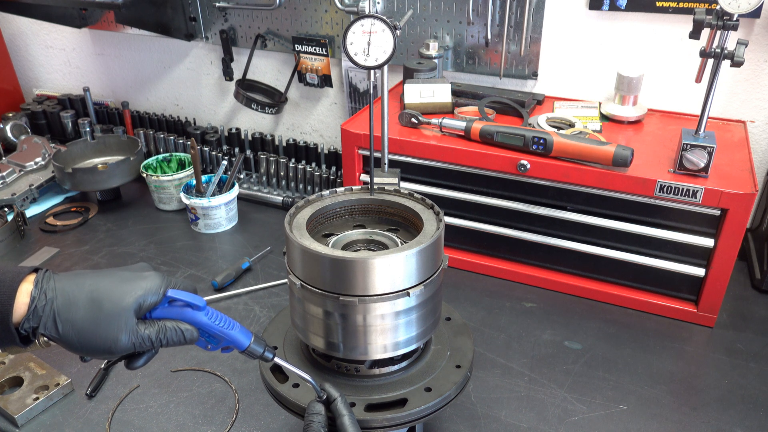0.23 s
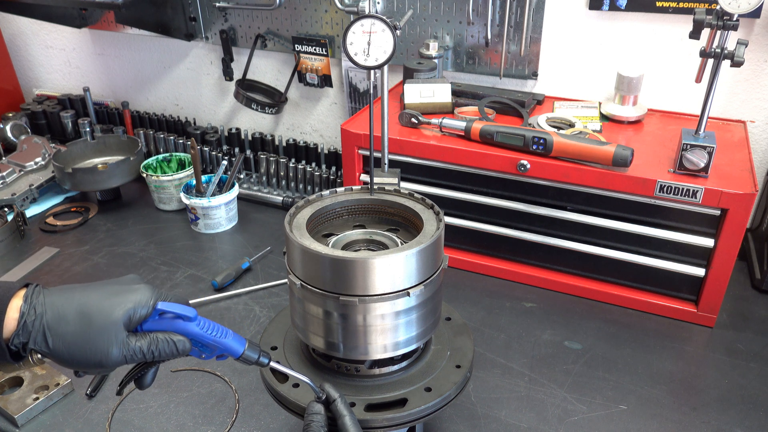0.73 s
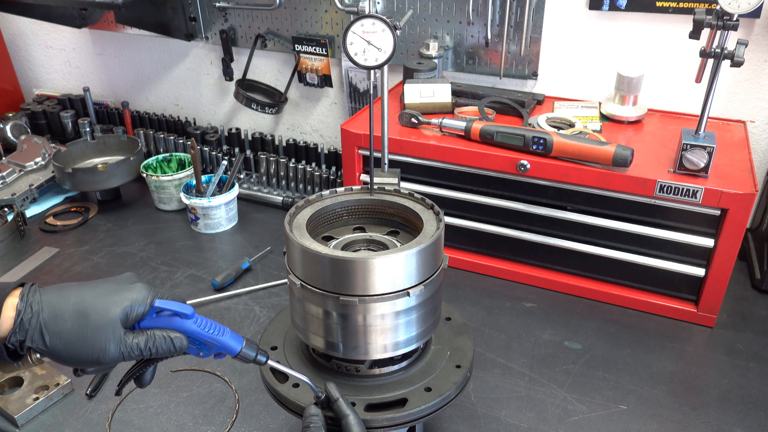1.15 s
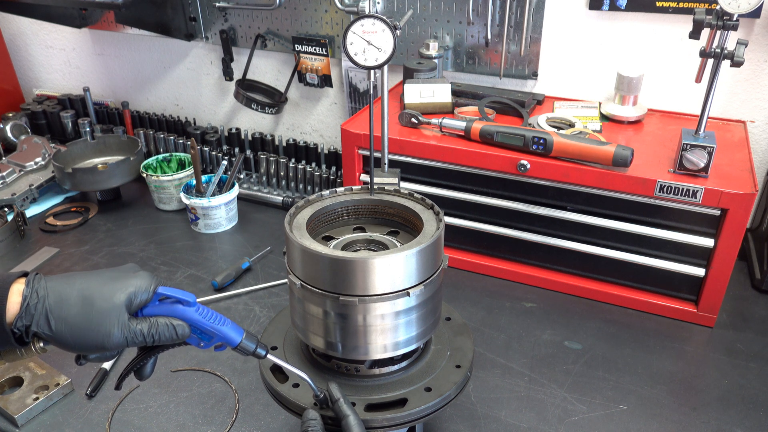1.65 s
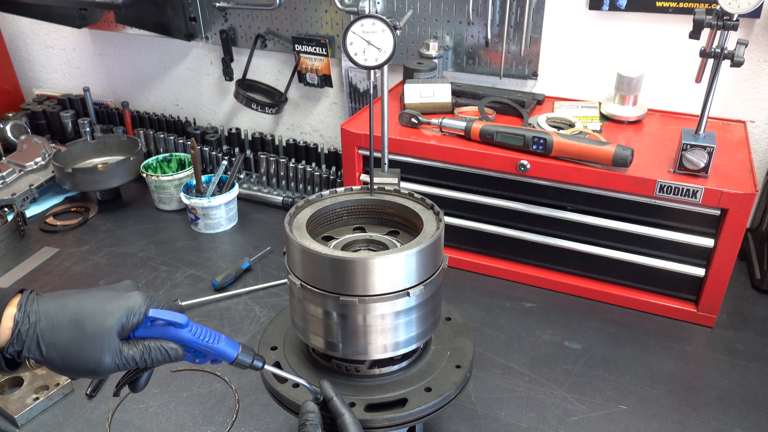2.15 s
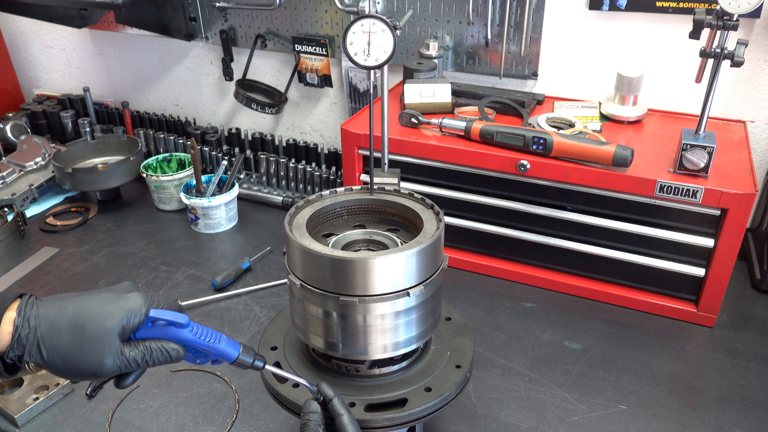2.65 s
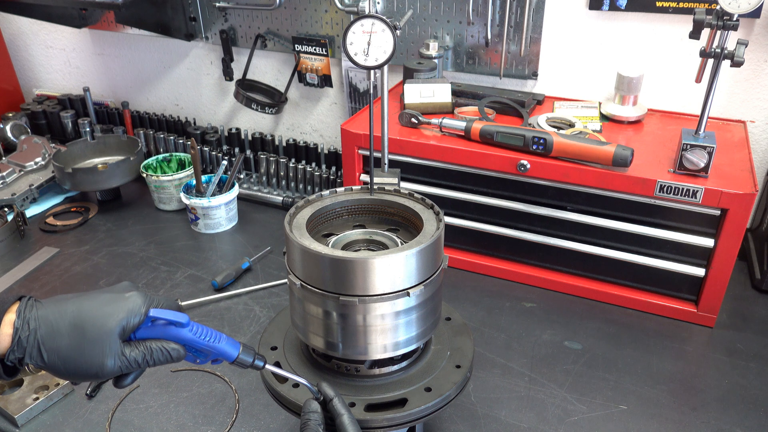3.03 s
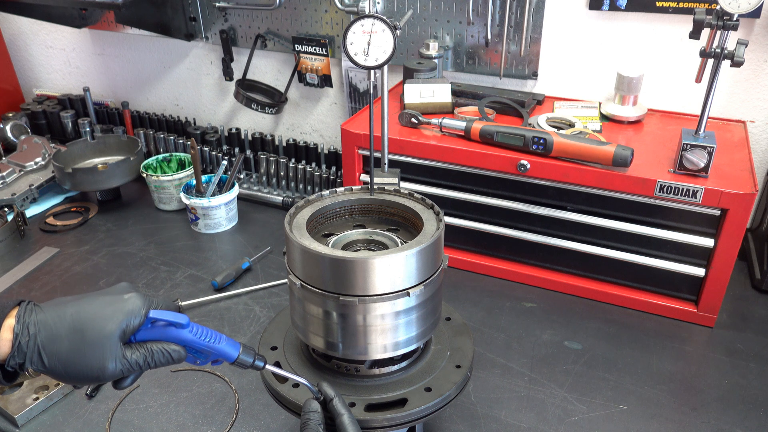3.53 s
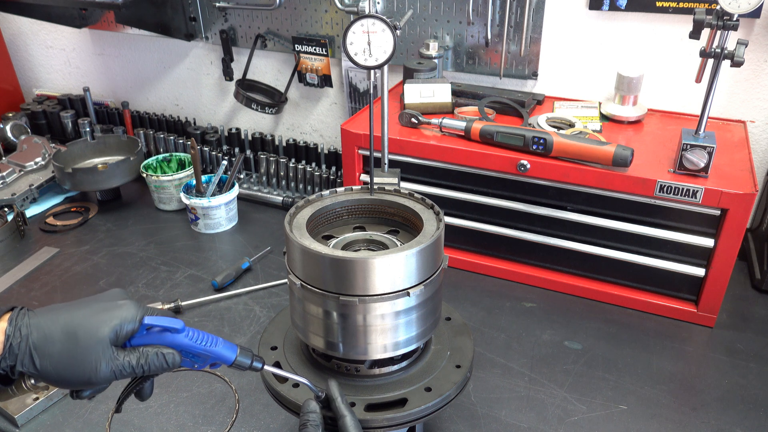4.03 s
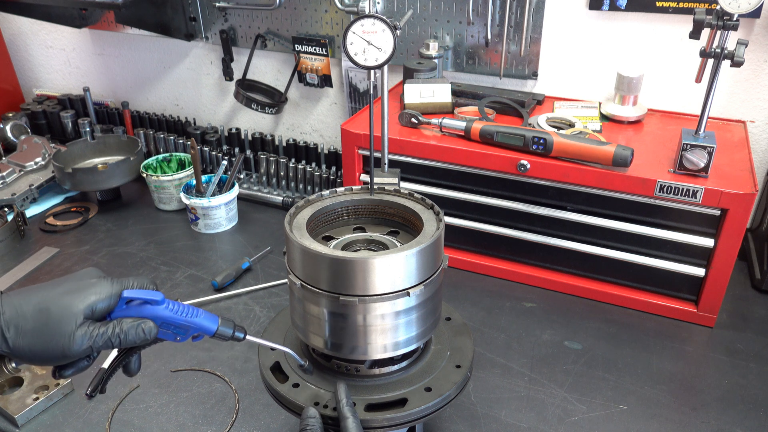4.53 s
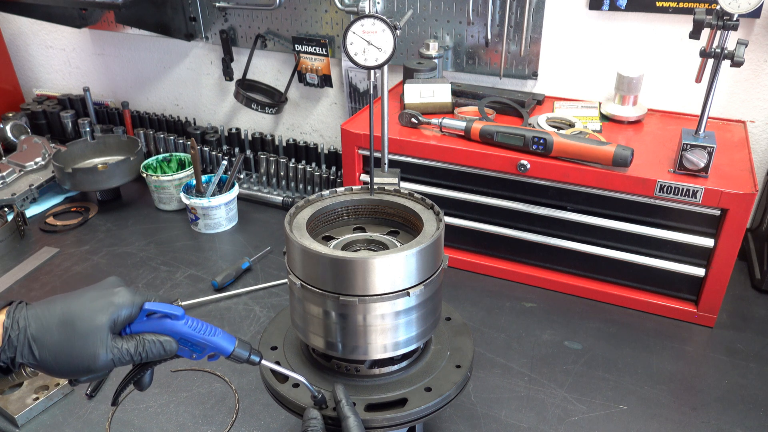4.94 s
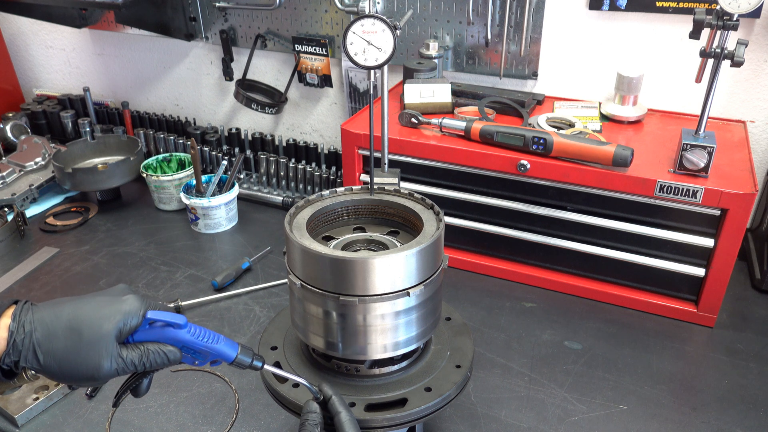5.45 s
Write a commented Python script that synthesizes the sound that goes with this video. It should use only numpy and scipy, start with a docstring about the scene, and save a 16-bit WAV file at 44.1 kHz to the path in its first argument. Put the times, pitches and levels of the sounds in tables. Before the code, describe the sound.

Compressed air blasts past a loose nozzle, bright and rough, then weakens and darkens before stopping. The room falls back to fan drone and thin leaking hiss. Rapid oily metallic clacks start a steady, resonant, much quieter air rush through a sealed drum; a sudden loud spit and brief venting whistle end it. Background only follows. Short indoor reverberation, centred sound, no voice.

```python
"""Compressed air hisses past a loose blow-gun nozzle, as the clutch drum of a transmission is air-tested on a bench.
Turbulent jets are shaped noise: the loose nozzle, the emptying drum, then a rush through the sealed drum.
Gliding edge tones, short spits and the knocks of piston and plates (damped modes and noise) mark the changes.
Behind them lie a ventilation drone, motor hum and a leaking air line; a limiter ducks them under loud blasts."""
import sys
import numpy as np
from scipy import signal
from scipy.fft import rfft, irfft
from scipy.io import wavfile
from scipy.ndimage import uniform_filter1d

SR = 44100
rng = np.random.default_rng(int(sys.argv[2]) if len(sys.argv) > 2 else 0)


def put_to_file(sound):
    """Save the sound as 16-bit audio at rate SR, in the file named by the first command-line argument."""
    columns = np.atleast_2d(sound).T  # one column per channel
    safe = np.clip(columns, -1, 1)
    whole_steps = np.round(safe * 32767)
    wavfile.write(sys.argv[1], SR, whole_steps.astype(np.int16))


N = 250488
TIME = np.arange(N) / SR

# spectrum of the jet at the nozzle: f/Hz, relative level per Hz/dB
JET_SPECTRUM = [(100, -47), (300, -25), (850, -23), (1100, -12.5), (1600, -11), (2200, -4.5), (3000, -10.5),
                (4200, -4.5), (6500, -3), (8500, 0), (10500, -4.5), (11600, -13), (13000, -8.5),
                (15500, -9)]
# spectrum of a dull impact: f/Hz, relative level per Hz/dB
THUD_SPECTRUM = [(40, -21), (130, 5.5), (230, -2.5), (900, -3.5), (1700, 7.5), (2600, -15), (4000, -11),
                 (15000, -50)]


def jet():
    """Jet noise: fast air shears through the gap between nozzle and port, giving a bright hiss."""
    # air escaping past the nozzle: start t/s, length t/s, level before the sag/dB
    blasts = [(0, 0.868, 8), (0.947, 0.062, 1.5), (3.942, 0.07, -18), (4.003, .135, -0.5)]
    # resonances of the gap: f/Hz, width f/Hz, lift/dB
    gap_peaks = [(1140, 150, 6), (1396, 51, 3), (1466, 47, -1.5), (1593, 120, 4.5), (1725, 54, 3.5),
                 (2333, 160, 7.5), (2590, 100, 5.5), (2670, 310, 0.5), (3786, 760, 9.5), (5869, 240, 6),
                 (7870, 600, 3), (10840, 410, 3.5)]
    rise_s, sag_db, shut_db_per_s = 0.042, 5.5, 280
    hiss = turbulent(noise(JET_SPECTRUM, gap_peaks), patchy_db=1.26, flutter_db=0.6)
    flow = np.zeros(N)
    for start, length, db in blasts:
        lead = rise_s * (start < rise_s)  # the first blast is already blowing
        opening = valve(start - lead, length + lead, rise_s, shut_db_per_s)
        sagging_db = db - sag_db * progress(start, length) ** 3
        flow += opening * amp(sagging_db)
    return band(hiss, 260, "high", order=2) * flow


def vent():
    """Blowdown: the drum empties through its open port; the hiss weakens and dulls as pressure falls."""
    # emptying of the drum: start t/s, length t/s, level with the drum full/dB
    ventings = [(0.651, 0.49, 0), (4.026, 0.28, .5)]
    # spectrum of the outflow: f/Hz, relative level per Hz/dB
    vent_spectrum = [(100, 5), (400, -18), (800, -12), (1300, -7), (2000, -7), (3000, -7.5), (4200, 0),
                     (6000, -9), (8500, -15), (10500, -22), (11600, -25), (15500, -45)]
    rise_s, sag_db, shut_db_per_s = 0.11, 10.5, 262
    half_empty, steepness = 0.5, 2.3  # share of a venting at half pressure, and how abruptly it falls
    full_tilt_db, empty_tilt_db = 6.5, -1.65  # per octave
    dulling_db_per_s = 39.5  # further loss of tilt once the venting ends
    flow, tilt = np.zeros(N), np.zeros(N)
    for start, length, db in ventings:
        pressure = 1 / (1 + (progress(start, length) / half_empty) ** steepness)
        opening = valve(start, length, rise_s, shut_db_per_s)
        flow += opening * amp(db - sag_db * (1 - pressure))
        spent_s = np.clip(TIME - start - length, 0, 0.1)
        brightness = empty_tilt_db + (full_tilt_db - empty_tilt_db) * pressure - dulling_db_per_s * spent_s
        tilt = np.where(TIME >= start, brightness, tilt)
    audible = flow > amp(-60)
    hiss = turbulent(noise(vent_spectrum), patchy_db=2.5, flutter_db=-0.3, tilt=tilt * audible)
    return band(hiss, 430, "high", order=2) * flow


def feed():
    """Pressure charging: air surges in, rushes through oil passages and fizzes past the piston seals."""
    # air fed through the sealed nozzle: start t/s, length t/s
    start, length = (2.536, 1.478)
    # spectrum of the inflow: f/Hz, relative level per Hz/dB
    feed_spectrum = [(100, -8), (300, -12.5), (450, -12.5), (750, -4), (1500, 2), (2200, -4.0),
                     (3000, -8.5), (4500, -1.5), (7300, -16.5), (9000, -11), (10500, -17), (11500, -18),
                     (14000, -16.5), (15500, -23)]
    # resonances of the oil passages: f/Hz, width f/Hz, lift/dB
    passage_peaks = [(447, 65, 12.9), (573, 103, 7.8), (1019, 29, 9.1), (1176, 19, 9.6), (1743, 62, 6.4),
                     (2120, 114, 7.4), (2380, 150, 14.3), (2774, 350, 7.3), (2940, 69, 6.7), (3235, 66, 7),
                     (4280, 930, 3.5), (6020, 140, 8.1), (6500, 520, 4.9), (7140, 520, 6.3),
                     (8569, 940, 9.9), (10050, 756, 10.8), (10920, 406, 6.5), (14700, 88, 5.5)]
    rush_db, rush_fill_db, fill_s = -18.5, 22, 0.17  # the rush starts 22 dB down and builds with pressure
    surge_db, surge_s = -23.5, 0.054  # first inrush, while the piston travels
    fizz_db, fizz_fill_db, creep_db_per_s = -29, 5.5, 3  # the seals leak more and more
    air = turbulent(noise(feed_spectrum, passage_peaks), patchy_db=0.42, flutter_db=0.5)
    rush = band(band(air, 246, "high", order=2), 7230, "low", order=8)
    fizz = band(air, 7580, "high", order=8)
    age = np.clip(TIME - start, 0, length)
    unfilled = np.exp(-age / fill_s)
    surge_gain = amp(surge_db) * np.exp(-(age / surge_s) ** 2)
    rush_gain = amp(rush_db - rush_fill_db * unfilled) + surge_gain
    fizz_gain = amp(fizz_db - fizz_fill_db * unfilled + creep_db_per_s * age)
    opening = valve(start, length, rise_s=0.0043, shut_db_per_s=251)
    return (evened(rush) * rush_gain + evened(fizz) * fizz_gain) * opening


def whistles(edge_s=0.0027, fade_db_per_s=35):
    """Edge tones: air crossing port and seal edges whistles, a gliding carrier roughened by narrow noise."""
    # start t/s, length t/s, start pitch f/Hz, end pitch f/Hz, width f/Hz, level before the fade/dB
    edge_tones = [(0.663, 0.03, 4324, 4230, 980, 7.5), (0.797, 0.014, 4250, 4120, 450, 6),
                  (0.855, .026, 5440, 6600, 900, -1.5), (2.534, 0.019, 2480, 2520, 596, -16),
                  (2.577, .22, 15450, 15450, 600, -37), (2.585, .17, 13450, 13450, 800, -39.5),
                  (2.571, .09, 2450, 2460, 110, -26.5), (2.658, 0.024, 2470, 2440, 200, -21.5),
                  (4.04, 0.026, 4700, 4290, 2640, -1.5), (4.104, 0.041, 2197, 2065, 250, -5.5),
                  (4.153, 0.035, 2126, 1840, 300, -5), (4.214, .13, 2050, 2085, 328, -12),
                  (4.813, 0.035, 2280, 2290, 400, -45)]
    out = np.zeros(N)
    for start, length, start_hz, end_hz, width, db in edge_tones:
        count = int(length * SR)
        fade = amp(-fade_db_per_s * TIME[:count])
        window = signal.windows.tukey(count, 2 * edge_s / length) * fade
        pitch_hz = np.linspace(start_hz, end_hz, count)
        carrier = np.exp(2j * np.pi * np.cumsum(pitch_hz) / SR)
        roughness = band(rng.standard_normal((2, SR // 2)), width / 2, "low", order=2)
        a, b = roughness[:, SR // 10:][:, :count]  # skips the filter's settling
        tone = evened(a * carrier.real + b * carrier.imag)
        add(out, start, amp(db) * window * tone)
    return out


def spits(puff_s=0.0016):
    """Transient bursts: milliseconds of bright hiss with a thud and a smooth pressure pulse."""
    # start t/s, length t/s, hiss level/dB, thud level/dB, puff level/dB
    bursts = [(0.953, 0.015, 6, -8, -3), (4.098, 0.0058, 8.5, -32, -11)]
    out = np.zeros(N)
    for start, length, db, thud_db, puff_db in bursts:
        window = signal.windows.tukey(int(length * SR), 0.7)
        hiss = evened(noise(JET_SPECTRUM)[:len(window)])
        thud = evened(noise(THUD_SPECTRUM)[:len(window)])
        puff = signal.windows.gaussian(len(window), puff_s * SR)
        add(out, start, window * (amp(db) * hiss + amp(thud_db) * thud + amp(puff_db) * puff))
    return out


def knocks(thud_t60=0.04, crack_t60=0.061, thump_hz=225, thump_t60=0.058):
    """Modal impact: piston and plates clatter and crack, ring the oily drum's modes and thump the bench."""
    # start t/s, level/dB, crack level/dB, thump level/dB; the last two are relative to the first level
    impacts = [(2.5415, -7, -2, -2.5), (2.546, -6.5, -23, -14), (2.5537, -7.5, -15, -30),
               (2.609, -12.5, -26, -8), (2.621, -29, -25, 16), (2.682, -12.5, -18, -15),
               (2.689, -10.5, -2, -5), (4.007, -15.5, 3, -22)]
    # modes of the drum: f/Hz, width before damping f/Hz, level within the ring/dB
    drum_modes = [(237, 91, -2), (522, 69, 8), (802, 8.3, -6), (995, 33, 2.5), (1420, 33, -6),
                  (2270, 42, -3), (3500, 53, -0.5), (5160, 120, -19), (5660, 32, -22), (6160, 110, 2),
                  (7060, 110, -11), (7360, 52, -23)]
    # spectrum of the crack: f/Hz, relative level per Hz/dB
    crack_spectrum = [(100, -40), (1500, 2), (3000, -3), (7500, -1), (9000, -13), (15000, -21)]
    ring_db = -3  # all modes together, against the clatter
    damping = 1.97  # oil widens every mode by this factor
    t, out = np.arange(SR // 4) / SR, np.zeros(N)
    thuds, cracks = noise(THUD_SPECTRUM), noise(crack_spectrum)
    onset = 1 - np.exp(-t / 0.0009)
    for k, (start, db, crack_db, thump_db) in enumerate(impacts):
        stretch = slice(k * len(t), (k + 1) * len(t))  # fresh noise for each knock
        thud = thuds[stretch] * amp(-60 * t / thud_t60)
        crack = cracks[stretch] * amp(crack_db - 60 * t / crack_t60)
        ring = np.zeros(len(t))
        for hz, width, mode_db in drum_modes:
            decay = np.exp(-np.pi * width * damping * t)
            ring += amp(mode_db) * decay * np.sin(2 * np.pi * (hz * t + rng.random()))
        thump = np.sin(2 * np.pi * thump_hz * t) * amp(thump_db - 60 * t / thump_t60)
        add(out, start, amp(db) * (thud + crack + amp(ring_db) * ring + thump) * onset)
    return out


def shop():
    """Stationary noise: ventilation drone, wavering motor hum and the thin hiss of a leaking air line."""
    # spectrum of the ventilation: f/Hz, relative level per Hz/dB
    drone_spectrum = [(20, -3), (38, -11), (55, 1.5), (75, -5.5), (100, -8.5), (200, -10.5), (300, -14),
                      (370, -10), (430, -2), (490, -15.5), (560, -13), (700, -21.5), (1200, -27.5),
                      (5000, -46)]
    # spectrum of the leak: f/Hz, relative level per Hz/dB
    leak_spectrum = [(300, -34), (900, -8.5), (1600, -9.5), (2700, -7.5), (3400, -4.5), (4300, 1),
                     (5600, -4.5), (7000, -3.5), (8700, -4.5), (10300, -7.5), (11700, -12.5),
                     (15500, -15.5)]
    # motor lines: f/Hz, width f/Hz, level at mid scene/dB
    motor_lines = [(53.8, 13, -38.5), (120.6, 4.8, -47.5)]
    drone = amp(-35.5) * noise(drone_spectrum)
    leak = amp(-36) * turbulent(noise(leak_spectrum), patchy_db=0.4, flutter_db=-0.23)
    hum = sum(amp(db) * narrow(hz, width) for hz, width, db in motor_lines)
    swell_db_per_s = 1.7
    return drone + leak + hum * amp(swell_db_per_s * (TIME - TIME.mean()))


def room(x, wet_db):
    """Reverberation: dense reflections off bench, tool chest and walls, each band decaying at its own rate."""
    # reverberation time: f/Hz, T60 t/s
    decay_times = [(100, 0.048), (500, 0.32), (1500, 0.55), (4000, 0.49), (8000, 0.4), (15000, 0.38)]
    signs = rng.choice([-1., 1.], SR)
    arrivals = rng.random(SR) < 4000 / SR  # about 4000 reflections per second
    taps = signs * arrivals * (np.arange(SR) > 0.002 * SR)
    hz, t, z = signal.stft(taps, SR, nperseg=256)
    t60 = read(decay_times, hz)[:, None]
    tail = signal.istft(z * amp(-60 * t / t60) / np.sqrt(t60), SR, nperseg=256)[1]
    wet = signal.fftconvolve(x, tail / np.linalg.norm(tail))[:N]
    return (x + amp(wet_db) * wet) / np.sqrt(1 + amp(wet_db) ** 2)


def valve(start, length, rise_s, shut_db_per_s):
    """Gated flow: the gain opens linearly, holds, then dies away exponentially."""
    age = TIME - start
    return np.clip(age / rise_s, 0, 1) * amp(-shut_db_per_s * np.maximum(age - length, 0))


def progress(start, length):
    """Normalized time: runs from 0 to 1 during an event."""
    return np.clip((TIME - start) / length, 0, 1)


def turbulent(x, patchy_db, flutter_db, tilt=0 * TIME):
    """Turbulence: eddies make spectral patches and flow flutter; tilt (dB per octave) brightens it."""
    hz, t, z = signal.stft(x, SR, nperseg=512, noverlap=384)
    patches = uniform_filter1d(rng.standard_normal(z.shape), size=9, axis=0)
    patches = evened(uniform_filter1d(patches, size=12, axis=1))
    flutter = evened(uniform_filter1d(rng.standard_normal(len(t)), size=6))
    octaves = np.log2(np.maximum(hz, 1000) / 4000)[:, None]  # about 4 kHz, constant below 1 kHz
    tilt_db = octaves * np.interp(t, TIME, tilt)
    z = z * amp(patchy_db * patches + flutter_db * flutter + tilt_db)
    return evened(signal.istft(z, SR, nperseg=512, noverlap=384)[1][:N])


def noise(spectrum, peaks=()):
    """Spectral shaping: steady noise with a broad colour, lifted or cut at each resonance."""
    hz = np.fft.rfftfreq(N, 1 / SR)
    db = read(spectrum, hz)
    for f, width, lift in peaks:
        db = db + lift / (1 + (2 * (hz - f) / width) ** 2)
    return evened(irfft(rfft(rng.standard_normal(N)) * amp(db), N))


def narrow(centre_hz, width_hz):
    """Narrow-band noise: one steep resonance gives a wavering tone."""
    hz = np.fft.rfftfreq(N, 1 / SR)
    resonance = 1 / (1 + (2 * (hz - centre_hz) / width_hz) ** 4)
    return evened(irfft(rfft(rng.standard_normal(N)) * resonance, N))


def band(x, edge_hz, kind, order=4):
    """Band limiting: Butterworth low-pass or high-pass."""
    return signal.sosfilt(signal.butter(order, edge_hz, kind, fs=SR, output="sos"), x)


def amp(db):
    """Logarithmic level: decibels to amplitude gain."""
    return 10 ** (np.asarray(db) / 20)


def evened(x):
    """Power normalization: scales to rms 1."""
    return x / np.sqrt(np.mean(x ** 2) + 1e-20)


def read(points, hz):
    """Interpolation of a table on a logarithmic frequency axis."""
    f, value = np.transpose(points)
    return np.interp(np.log(hz + 1), np.log(f + 1), value)


def add(mix, start, sound):
    """Superposition: adds a sound to the mix, in place, from start seconds."""
    part = mix[round(start * SR):][:len(sound)]
    part += sound[:len(part)]


def scene():
    """Superposition of all sources in the shop, the same on both channels."""
    air = room(jet() + vent() + whistles(), wet_db=-6.5) + room(feed(), wet_db=-8.5)
    impacts = room(spits(), wet_db=-4.5) + room(knocks(), wet_db=-4.5)
    mono = air + impacts + shop()
    return np.array([mono, mono])


def record(dry, limit_db=-13.0, follow_s=0.014, held_share=0.19, held_fall_db_per_s=9, ceiling=1.0):
    """Gain control: a limiter holds blasts level and recovers slowly; quick peaks clip, then a low-pass."""
    power = abs(uniform_filter1d((dry ** 2).mean(0), size=400))
    over_db = np.maximum(10 * np.log10(power + 1e-12) - limit_db, 0)
    keep = np.exp(-1 / (follow_s * SR))
    settled = [keep * over_db[:SR // 100].mean()]  # already following the first blast
    quick_db = signal.lfilter([1 - keep], [1, -keep], over_db, zi=settled)[0]
    fall_db = held_fall_db_per_s * TIME
    held_db = np.maximum.accumulate(quick_db + fall_db) - fall_db
    # a share of the slowly falling held peak outlasts the quick reduction
    reduction_db = np.maximum(quick_db, held_share * held_db)
    clipped = np.clip(dry * amp(-reduction_db), -ceiling, ceiling)
    low_pass = signal.firwin(801, 15750, window=("kaiser", 7), fs=SR)  # edge in Hz
    return signal.oaconvolve(clipped, low_pass[None], "same")


dry = scene()
out = record(dry)
put_to_file(out)
```